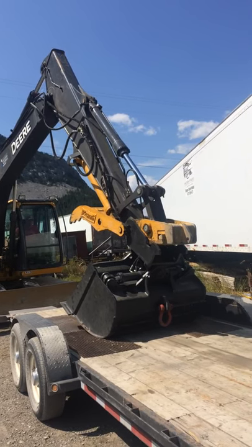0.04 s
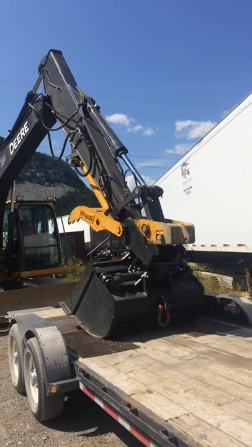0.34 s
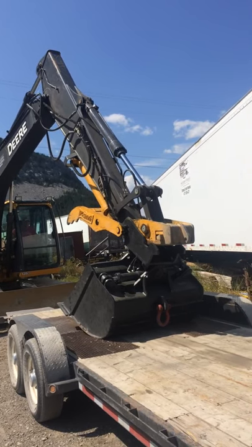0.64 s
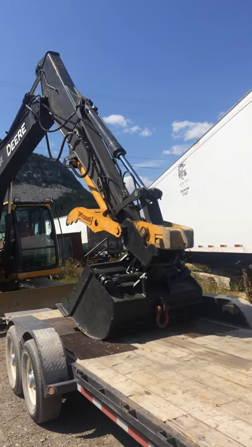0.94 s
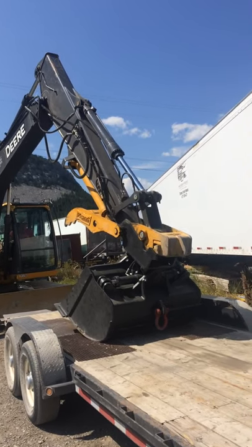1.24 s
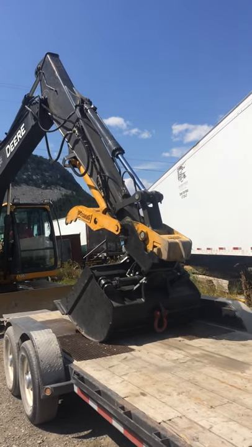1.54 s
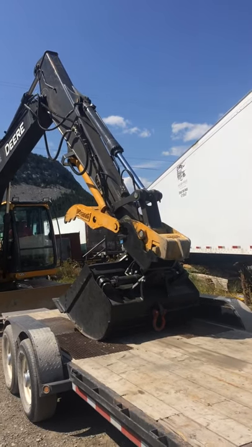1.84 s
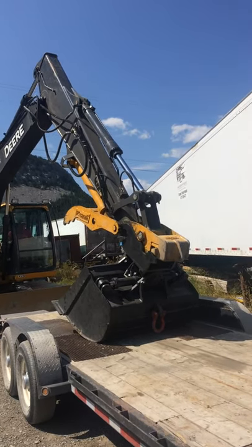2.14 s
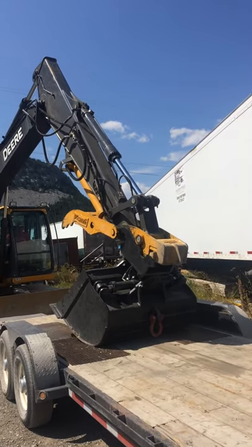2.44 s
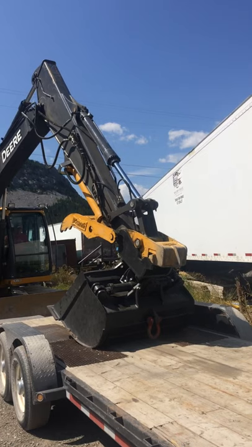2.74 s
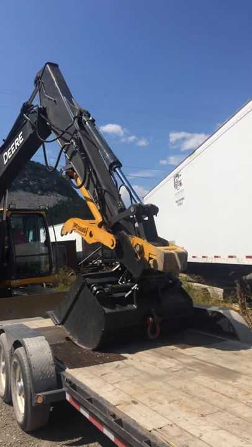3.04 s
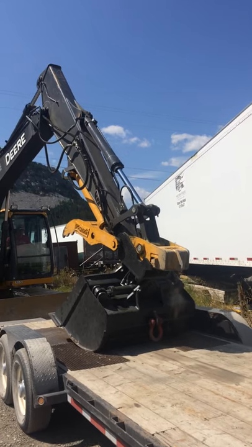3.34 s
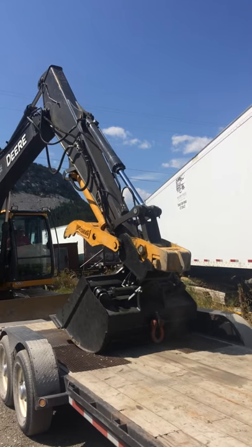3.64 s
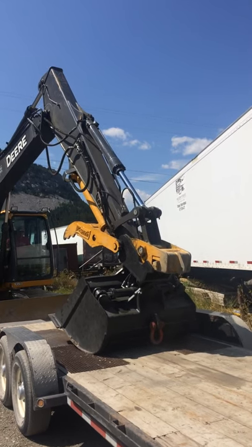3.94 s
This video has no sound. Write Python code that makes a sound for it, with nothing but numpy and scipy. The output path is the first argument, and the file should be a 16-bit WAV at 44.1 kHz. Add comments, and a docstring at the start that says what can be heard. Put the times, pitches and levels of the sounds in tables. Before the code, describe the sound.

An excavator's steel coupler clanks against its bucket outdoors, a few metres away, over a continuous diesel drone with pump whine and hiss. A sharp clank comes at 0.7 seconds, a boom and more clanks from 1.2 to 1.4, and dull thumps near 1.7 and 2.4. At 3.1 comes the loudest, rattling crash, with scraping and thin squeals. The latch snaps shut around 3.3, and low thumps follow.

```python
"""A diesel drones a few metres away, outdoors, with the whine of its pump and a high hiss.
It is an excavator working its steel coupler against a bucket that rests on a trailer.
Impacts excite the modes of the steel: the coupler clanks, then drops home with a rattling crash.
Friction makes it scrape and squeal thinly, and it clanks again as the latch snaps shut.
Low booms, thumps and dull knocks sound beneath it, and the engine runs on throughout."""
import sys
import numpy as np
from scipy import signal
from scipy.fft import rfft, irfft
from scipy.io import wavfile

SR = 44100
rng = np.random.default_rng(int(sys.argv[2]) if len(sys.argv) > 2 else 0)


def waveform_to_disk(signal):
    """Save audio, clipped to [-1, 1], as 16-bit WAV at the path in sys.argv[1]."""
    frames = np.transpose(np.atleast_2d(signal))
    scaled = np.clip(frames, -1, 1) * 32767
    samples = np.round(scaled).astype(np.int16)
    wavfile.write(sys.argv[1], SR, samples)


N = 176400


def undb(db):
    """Amplitude ratio of a level in decibels."""
    return 10 ** (np.asarray(db) / 20)


def unit(x):
    """Normalisation to rms 1."""
    return x / np.std(x)


def envelope(rows):
    """Gain interpolated in decibels through (time_s, level_db) points."""
    return undb(np.interp(np.arange(N) / SR, *np.array(rows).T))


def noise(lo_hz, hi_hz, colour=None, order=8):
    """Band-limited noise of rms 1, optionally shaped by (frequency_hz, level_db) points."""
    f = np.maximum(np.fft.rfftfreq(N, 1 / SR), 1)
    gain = 1 / np.sqrt((1 + (lo_hz / f) ** order) * (1 + (f / hi_hz) ** order))
    if colour is not None:
        hz, db = np.array(colour).T
        gain = gain * undb(np.interp(np.log(f), np.log(hz), db))
    return unit(irfft(rfft(rng.standard_normal(N)) * gain, N))


def drift(rate_hz):
    """Random fluctuation of rms 1: noise low-passed near rate_hz."""
    f = np.fft.rfftfreq(N, 1 / SR)
    return unit(irfft(rfft(rng.standard_normal(N)) * (f > 0) * np.exp(-(f / rate_hz) ** 2), N))


def sine(hz):
    """A tone of rms 1 whose phase is the integral of its frequency."""
    return np.sqrt(2) * np.sin(2 * np.pi * (np.cumsum(hz) / SR + rng.random()))


def decay(t, t60):
    """Exponential decay, 60 dB in t60 seconds."""
    return np.exp(-np.log(1000) * t / t60)


def rise(t, time_constant):
    """Exponential approach to full amplitude."""
    return 1 - np.exp(-t / time_constant)


def swell(t, length):
    """Half-sine envelope."""
    return np.sin(np.pi * np.clip(t / length, 0, 1))


def ring(t, modes):
    """Free vibration: a sum of damped sinusoids, one for each mode."""
    return sum(undb(db) * np.sin(2 * np.pi * (hz * t + rng.random())) * decay(t, t60)
               for hz, db, t60 in modes)


def add(out, start, x):
    """Superposition of x on out, from start seconds."""
    i = int(start * SR)
    out[i:i + len(x)] += x[:N - i]


# Engine and fan partials: pitch_hz, level_db
ENGINE_PARTIALS = [(129.3, -40), (178, -51), (209.5, -47.5), (256, -50.5), (360, -55), (807, -58),
                   (1076, -58), (1341, -60.5), (1728, -59), (2143, -65.5)]
# Spectral density of the machine's noise: frequency_hz, relative_level_db
MACHINE_SPECTRUM = [(20, -27), (50, -2), (90, 2), (150, -1), (200, 4), (240, -7), (320, -8.5), (430, -19.5),
                    (620, -16), (900, -18), (1200, -22.5), (1350, -20), (1520, -24), (1850, -23.5),
                    (2550, -30.5), (2950, -28), (3270, -25.5), (3750, -35.5), (4400, -37), (5700, -32),
                    (7500, -38), (9200, -45.5), (12300, -48), (14000, -53.5), (15500, -50)]
# Levels of the pump whine, drone, clatter, high hiss and its top fizz: time_s, level_db
PUMP_LEVELS = [(0, -43.5), (.22, -40.5), (.42, -51), (1.0, -47), (1.8, -48), (2.1, -41), (2.42, -40),
               (2.7, -48.5), (3.6, -50), (4, -47)]
DRONE_LEVELS = [(0, -27.5), (.15, -24), (.42, -37), (.62, -32), (.9, -28), (1.25, -30), (1.5, -35),
                (2.2, -34), (2.6, -33.5), (3.0, -33.5), (3.6, -31.5), (3.8, -24), (4, -30.5)]
CLATTER_LEVELS = [(0, -40.5), (.5, -39.5), (1.15, -37), (1.5, -36.5), (1.9, -39.5), (2.5, -40), (3.05, -37),
                  (3.6, -41), (4, -37)]
HISS_LEVELS = [(0, -51.5), (.6, -48), (1.2, -47), (1.6, -46), (2.15, -51), (3.0, -47), (3.45, -44.5),
               (3.55, -53.5), (3.72, -51), (3.8, -47.5), (4, -49)]
FIZZ_LEVELS = [(0, -67), (.7, -60.5), (1.3, -57.5), (1.85, -59), (2.3, -58), (3.0, -54.5), (3.5, -57.5),
               (3.58, -67), (3.72, -64), (3.82, -57.5), (4, -57.5)]
FIRING_HZ, PUMP_HARMONIC = 60, 10


def engine():
    """Rotating machinery: tones follow one shaft speed, and the firings modulate clatter and hiss."""
    speed = 1 + 0.00404 * drift(5.24)
    firing = sine(FIRING_HZ * speed)
    hum = sum(undb(db + 4.7 * drift(3.8)) * sine(hz * speed) for hz, db in ENGINE_PARTIALS)
    pump_gain = envelope(PUMP_LEVELS) * undb(2.5 * drift(23))
    pump = pump_gain * sine(PUMP_HARMONIC * FIRING_HZ * (speed + .008 * drift(30)))
    drone = envelope(DRONE_LEVELS) * noise(20, 334, MACHINE_SPECTRUM)
    clatter = envelope(CLATTER_LEVELS) * noise(334, 3060, MACHINE_SPECTRUM) * undb(1.1 * drift(32))
    hiss = envelope(HISS_LEVELS) * noise(3060, 8650, MACHINE_SPECTRUM, order=12)
    fizz = envelope(FIZZ_LEVELS) * noise(8650, 13800, MACHINE_SPECTRUM, order=20)
    pulsation = 1 + 0.085 * firing
    return undb(-39) * firing + hum + pump + drone + (clatter + hiss + fizz) * pulsation


# Low booms and dull thumps: start_s, level_db, pitch_hz, rise_s, t60_s
LOW_BOOMS = [(0.67, -13, 187.5, 0.021, 0.27), (1.153, -7.5, 185, 0.018, 0.19),
             (1.157, -11.5, 267, 0.0046, 0.082), (1.157, -13, 74, 0.0084, 0.12),
             (1.189, -20, 178, .003, 0.1), (1.651, -11.5, 85, .005, 0.091),
             (1.684, -14, 115, 0.0022, 0.078), (1.712, -21, 125, .003, .09),
             (2.385, -17, 168, 0.0057, 0.14), (2.433, -9.5, 72.4, 0.003, 0.13),
             (2.436, -16.5, 153, .003, 0.078), (3.105, -8, 193, 0.0055, 0.15),
             (3.176, -6.5, 183, 0.0053, 0.11), (3.181, -21.5, 174.5, .01, 1.96),
             (3.355, -16, 234, 0.0081, 0.18), (3.48, -17.5, 177.3, 0.0061, 0.29),
             (3.671, -24, 175.6, 0.011, 0.93), (3.744, -11, 177, 0.002, 0.062)]


def booms(t):
    """Damped oscillation: low sinusoids that build and die away are heard as booms and dull thumps."""
    out = np.zeros(N)
    for start, db, hz, rise_s, t60 in LOW_BOOMS:
        add(out, start, undb(db) * np.sin(2 * np.pi * hz * t) * rise(t, rise_s) * decay(t, t60))
    return out


# Grit cracking between the faces: start_s, level_db, t60_s
GRIT_CRACKS = [(0.530, -46, .06), (0.6995, -34, 0.021), (0.7098, -25.5, 0.02), (1.3215, -35.5, 0.072),
               (1.3632, -24, 0.042), (1.48, -40, 0.022), (1.592, -39.5, .02), (1.699, -41.5, .04),
               (2.69, -41.5, 0.048), (3.082, -22, 0.11), (3.336, -32, 0.03)]
# Faces rubbing under load: start_s, length_s, level_db, low_edge_hz, high_edge_hz
FACE_SCRAPES = [(1.608, 0.13, -35, 280, 700), (3.132, 0.073, -24, 3000, 8900),
                (3.186, 0.12, -32.5, 1500, 8000), (3.415, 0.085, -42.5, 900, 4940),
                (3.782, .05, -35, 1060, 2780)]
# Squeals of the pin: start_s, length_s, pitch_hz, level_db
PIN_SQUEALS = [(3.196, 0.025, 8050, -34.5), (3.238, 0.11, 7970, -43), (3.285, .025, 4680, -42),
               (3.365, 0.15, 7990, -49)]


def friction(t):
    """Sliding friction: grit cracks, the faces scrape unevenly and the pin squeals on a wavering tone."""
    out, n = np.zeros(N), len(t)
    for start, db, t60 in GRIT_CRACKS:
        add(out, start, undb(db) * noise(3870, 9800)[:n] * decay(t, t60))
    for start, length, db, lo_hz, hi_hz in FACE_SCRAPES:
        rubbing = unit(noise(lo_hz, hi_hz) * undb(2.5 * drift(200)))[:n]
        add(out, start, undb(db) * rubbing * swell(t, length))
    for start, length, hz, db in PIN_SQUEALS:
        squeal = sine(hz * (1 + .009 * drift(230)))[:n]
        add(out, start, undb(db) * squeal * np.sqrt(abs(swell(t, length))))
    return out


# Dull knocks, and the sharp snap that opens the first clank at 0.71 s: centre_s, peak_db, pitch_hz,
# half_width_cycles
KNOCK_PULSES = [(0.7107, -2, 700, 1.02), (1.167, -26.5, 348, 2), (1.294, -17, 333, 0.68),
                (1.342, -23, 676, 5), (1.370, -23, 714, 5.6), (1.648, -26.5, 460, 2.3),
                (1.6902, -13.5, 480, 0.41), (1.717, -23, 430, 2.4), (2.4101, -12.5, 464, 0.76),
                (2.440, -13.5, 530, 1.35), (2.6385, -19.5, 464, 0.84)]
KNOCK_TAIL_DB, KNOCK_T60_S = -21, 0.23


def knocks(t):
    """Wave packets: a few cycles under a Gaussian envelope make a brief low thud, or at 0.71 s the sharp snap
    of a clank, each with a faint tail."""
    out = np.zeros(N)
    for centre, db, hz, half_width in KNOCK_PULSES:
        cycles = (np.arange(N) / SR - centre) * hz
        out -= undb(db) * np.exp(-(cycles / half_width) ** 2) * np.cos(2 * np.pi * cycles)
        tail = noise(hz * 0.76, hz * 1.52, order=12)[:len(t)] * decay(t, KNOCK_T60_S)
        add(out, centre, undb(db + KNOCK_TAIL_DB) * tail)
    return out


# Modes of the latch: pitch_hz, level_db, t60_s
LATCH_MODES = [(972, -17.5, 0.2), (2685, -25.5, 0.1), (3138, -35, 0.14), (3806, -30, 0.11),
               (5600, -39, 0.088), (5600, -34, 0.1), (6000, -27, 0.074)]


def latch(t, start_s=3.336):
    """Impulse response: the latch snaps shut and rings at its natural frequencies."""
    out = np.zeros(N)
    add(out, start_s, ring(t, LATCH_MODES))
    return out


def plate_resonances(from_hz=1400, mean_gap_hz=56, power_share=0.39):
    """Modal density: randomly spaced peaks carry a share of the power in the plates' upper response."""
    f = np.fft.rfftfreq(N, 1 / SR)
    chance = SR / N / mean_gap_hz
    is_mode = rng.random(len(f)) < chance
    comb = np.sqrt(1 - power_share + power_share / chance * is_mode)
    return np.where(f > from_hz, comb, 1)


# Spectral density of struck steel plate: frequency_hz, relative_level_db
STEEL_SPECTRUM = [(100, 17), (220, 16), (420, 0.5), (560, 5.5), (850, -2.5), (1800, -3.5), (3100, -7),
                  (4000, -10.5), (5500, -13), (6900, -11.5), (9500, -17.5), (15500, -15)]
BUILD_CYCLES, T60_EXPONENT = 0.57, 0.11


def plates(t, lo_hz, hi_hz, t60, resonances):
    """Frequency-dependent damping: in welded plate's dense modes the treble builds and dies first."""
    vibration = irfft(rfft(noise(lo_hz, hi_hz, STEEL_SPECTRUM)) * resonances, N)
    spectrum = rfft(vibration[:len(t)])
    octaves = np.log2(np.maximum(np.fft.rfftfreq(len(t), 1 / SR), 1))
    out = 0
    for octave in range(6, 15):
        centre_hz = 2 ** octave
        band = irfft(spectrum * np.maximum(1 - abs(octaves - octave), 0), len(t))
        band_t60 = t60 * (1000 / centre_hz) ** T60_EXPONENT
        out = out + band * rise(t, BUILD_CYCLES / centre_hz) * decay(t, band_t60)
    return out


# Free modes of the bucket: pitch_hz, relative_level_db, t60_s
BUCKET_MODES = [(244, -18, 0.72), (280, -10, 0.67), (378.3, -10, 1), (531, -2.5, 0.24), (602, -12, 0.21),
                (638, -7.5, 0.3), (722, -8.5, 0.56), (738, -18, 0.32), (981, -18, 0.74), (1033, -12, 0.96),
                (1176, -21, 0.35), (1297, -8, 0.34), (1460, -5, 0.26), (1864, -7.5, 0.21),
                (2020, -11, 0.15)]
# Blows of the coupler:
# start_s, plate_level_db, low_edge_hz, high_edge_hz, plate_t60_at_1khz_s, bucket_level_db, contact_s
COUPLER_BLOWS = [(0.7100, -18.5, 1800, 5950, .05, -42, 0.00051), (0.712, -19, 524, 2600, 0.15, -21.5, .002),
                 (1.152, -21, 170, 1470, 0.25, -38, 0.00093),
                 (1.3014, -15.5, 1080, 3740, 0.063, -37, .0005), (1.312, -16, 875, 1960, 0.12, -30, .001),
                 (1.336, -15, 464, 900, 0.071, -28, 0.0014), (1.3636, -17.5, 685, 9500, 0.13, -27, 0.00046),
                 (1.43, -29, 450, 900, 0.12, -35, .005), (3.0781, -14, 607, 2400, .1, -30, 0.00062),
                 (3.0828, -5, 724, 4030, 0.08, -23, 0.00092), (3.092, -6.5, 414, 8100, 0.22, -16.5, 0.0007),
                 (3.110, -9.5, 190, 1520, 0.21, -15, .001), (3.128, -12.5, 230, 3920, 0.54, -18, .001),
                 (3.336, -20, 1580, 7900, 0.12, -29, 0.00089),
                 (3.352, -21.5, 196, 2640, 0.62, -30.5, 0.0022),
                 (3.479, -26.5, 507, 9200, 0.15, -37, 0.0052)]
CONTACT_DAMPING = 0.17  # steel pressed on the bucket adds this share of the plates' decay rate


def clanks(t):
    """Impact excitation: each blow of the coupler chatters on the plates and rings the bucket's modes."""
    out = np.zeros(N)
    resonances = plate_resonances()  # the same steel for every blow
    for start, plate_db, lo_hz, hi_hz, t60, bucket_db, contact_s in COUPLER_BLOWS:
        bucket = ring(t, BUCKET_MODES) * rise(t, .003) * decay(t, t60 / CONTACT_DAMPING)
        chatter = undb(1.4 * drift(400)[:len(t)])
        clank = rise(t, contact_s) * chatter * plates(t, lo_hz, hi_hz, t60, resonances)
        add(out, start, undb(plate_db) * clank + undb(bucket_db) * bucket)
    return out


def scene():
    """Superposition: the pressures of all sources add at one microphone."""
    t = np.arange(SR) / SR  # one second for each event to die away
    return (engine() + clanks(t) + latch(t) + knocks(t) + booms(t) + friction(t))[None]


def record(dry):
    """Soft saturation rounds the loudest peaks, and a low-pass filter removes the highest treble."""
    ceiling, cutoff_hz = 1.3, 15700
    lowpass = signal.ellip(8, .2, 70, cutoff_hz, fs=SR, output="sos")
    return signal.sosfilt(lowpass, ceiling * np.tanh(dry / ceiling))


dry = scene()
out = record(dry)
waveform_to_disk(out)
```